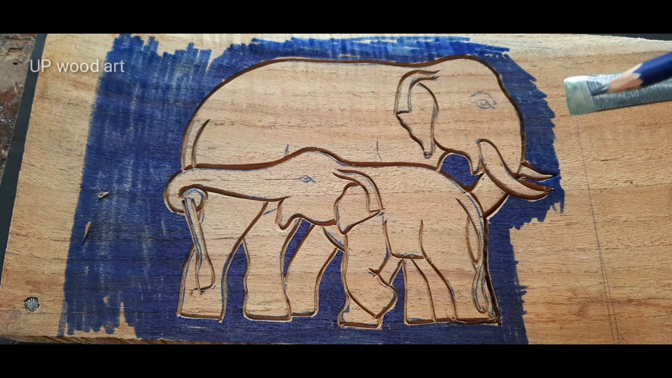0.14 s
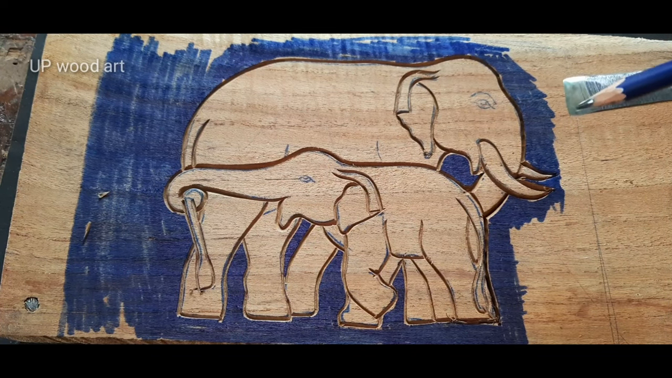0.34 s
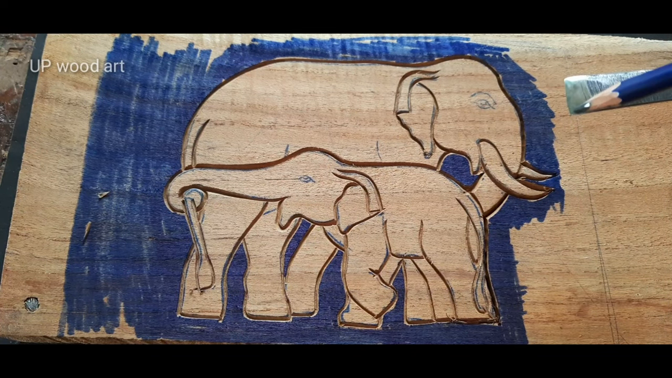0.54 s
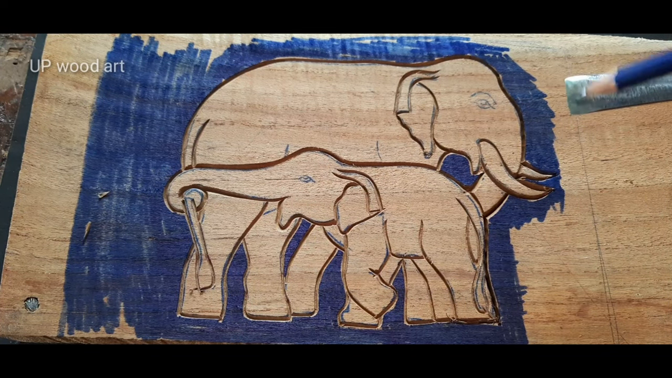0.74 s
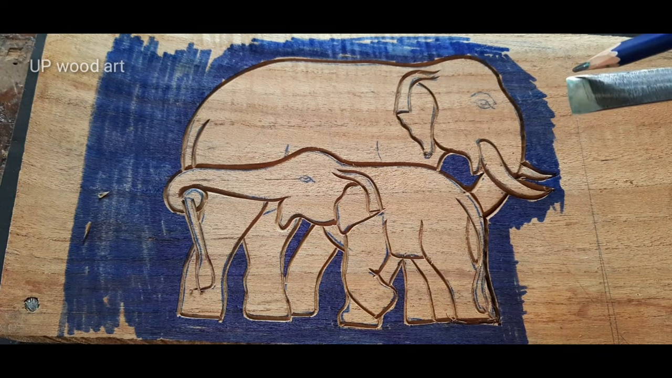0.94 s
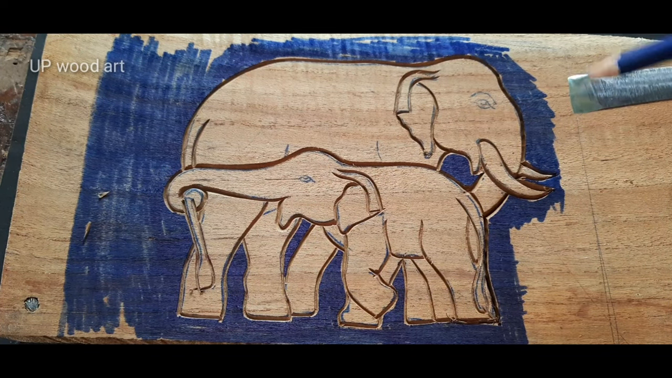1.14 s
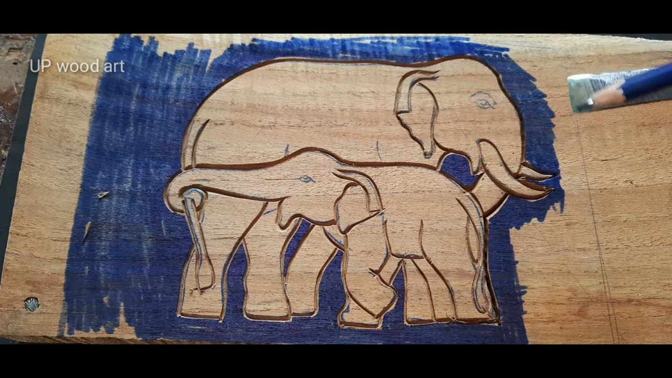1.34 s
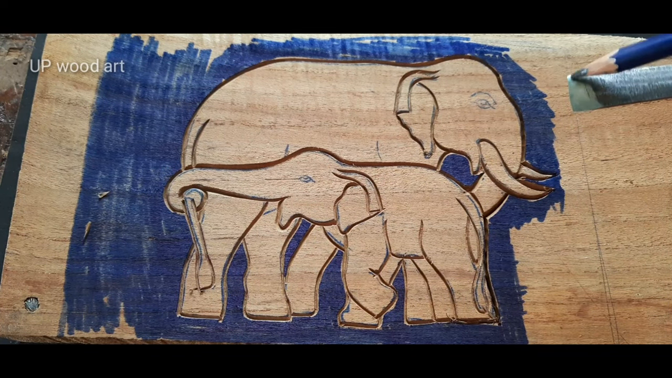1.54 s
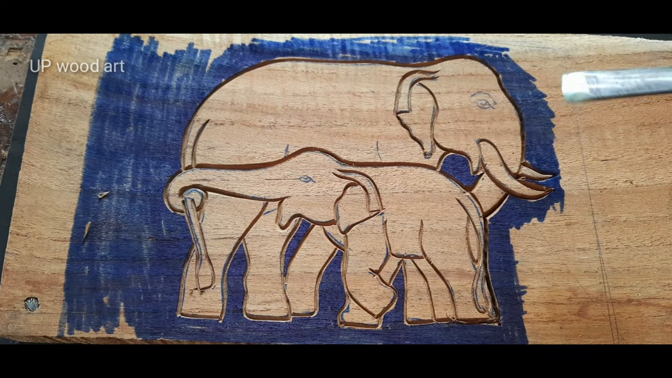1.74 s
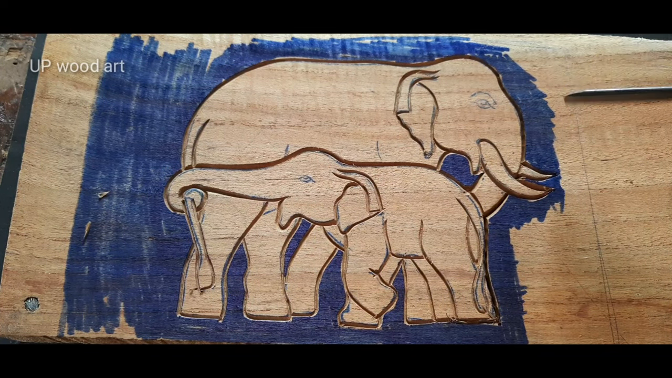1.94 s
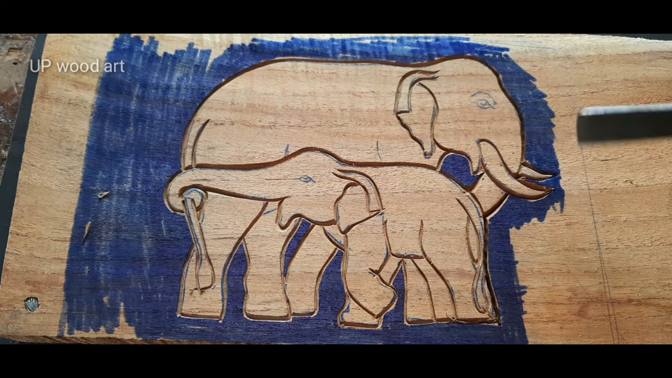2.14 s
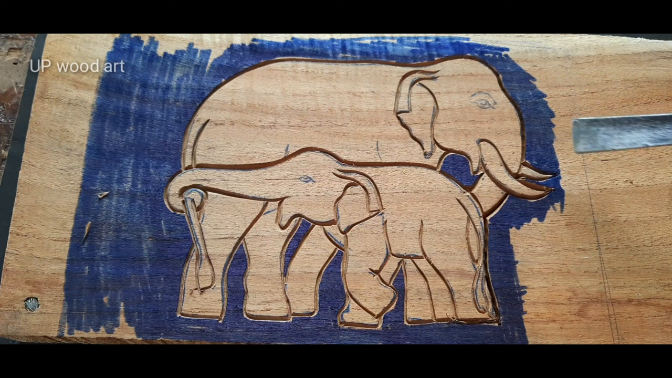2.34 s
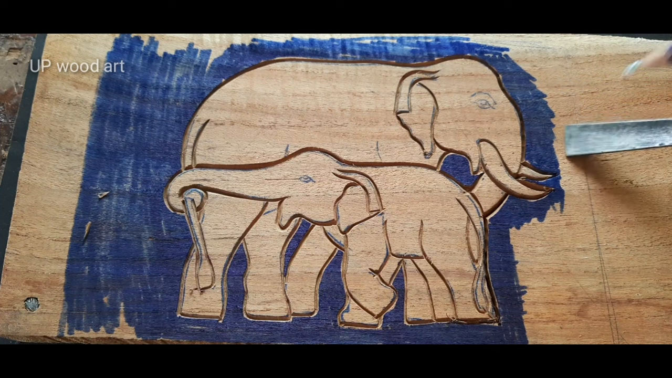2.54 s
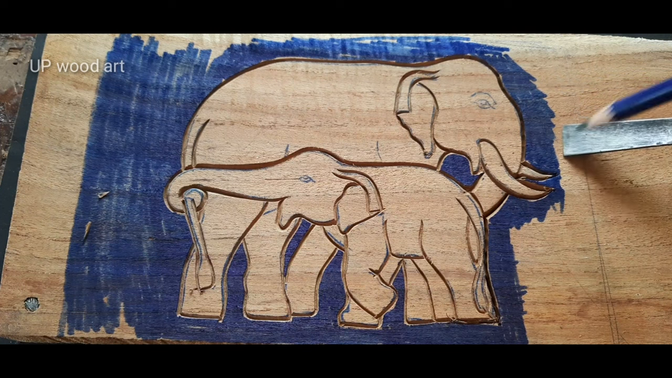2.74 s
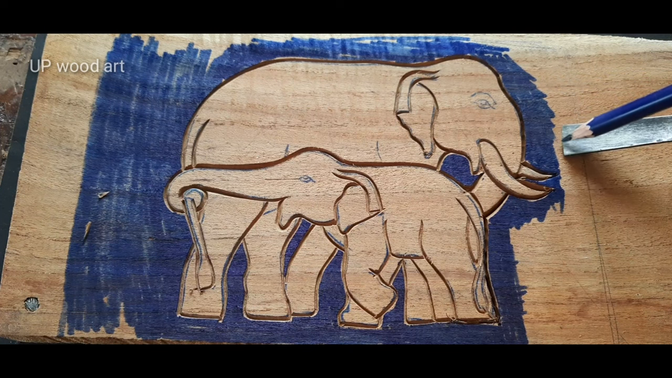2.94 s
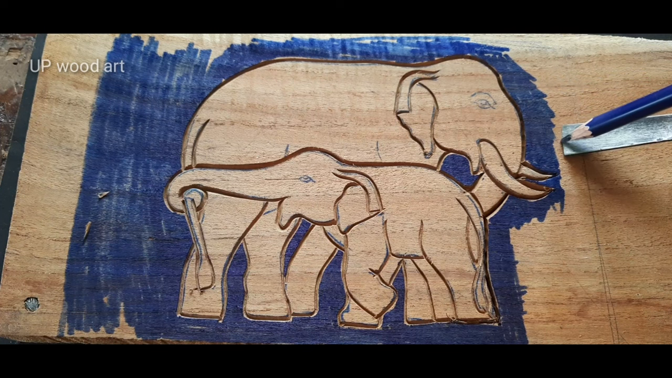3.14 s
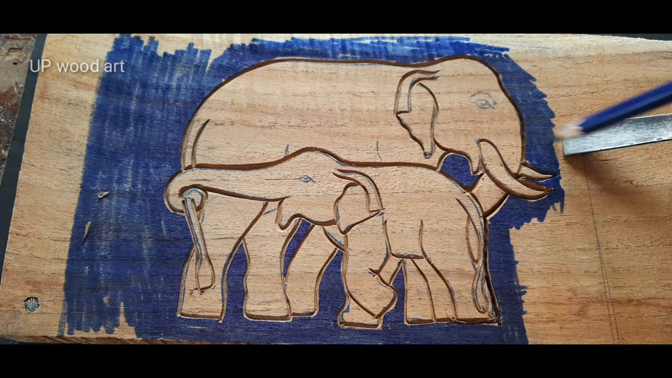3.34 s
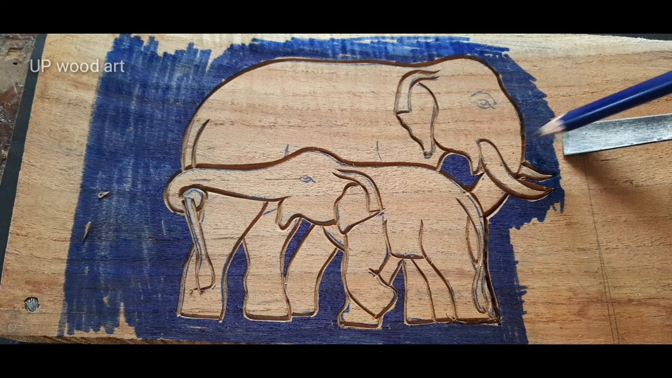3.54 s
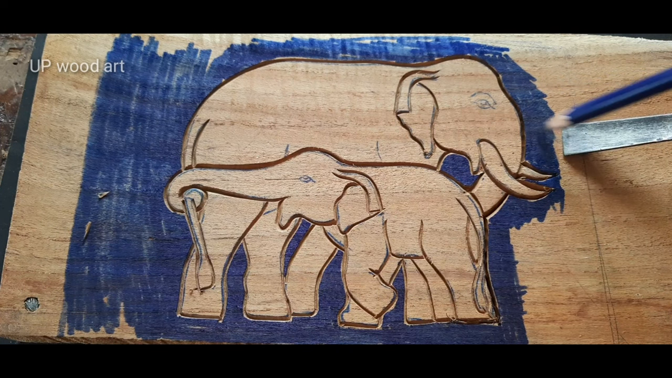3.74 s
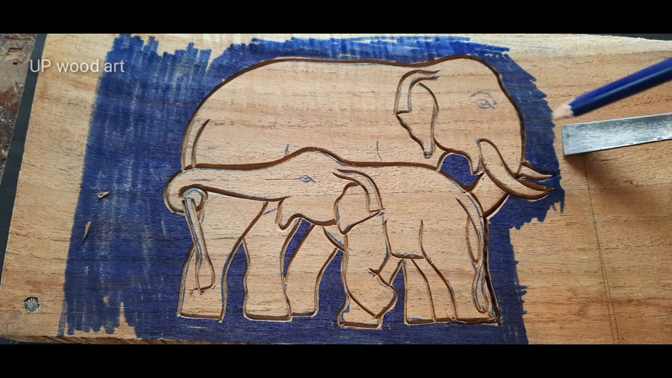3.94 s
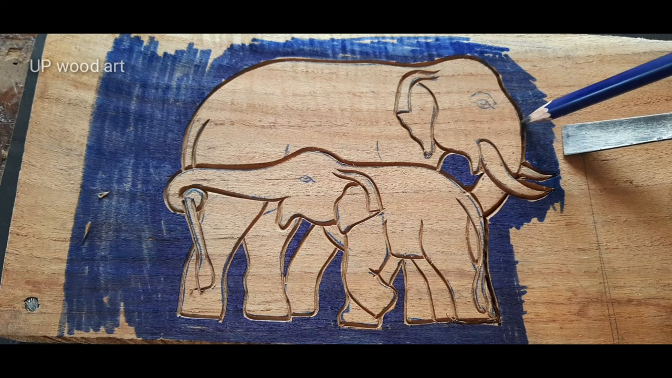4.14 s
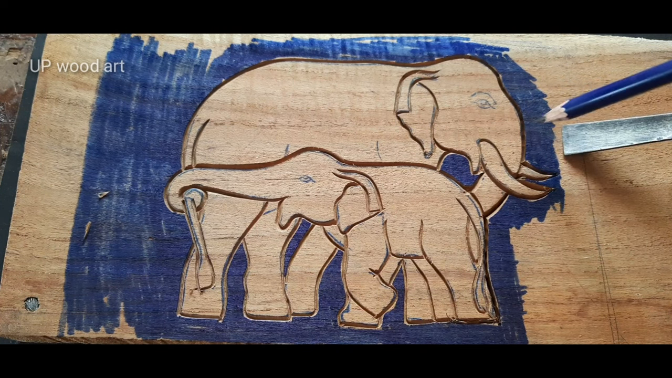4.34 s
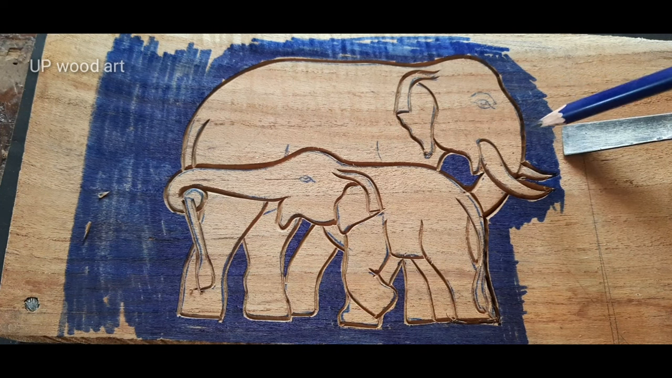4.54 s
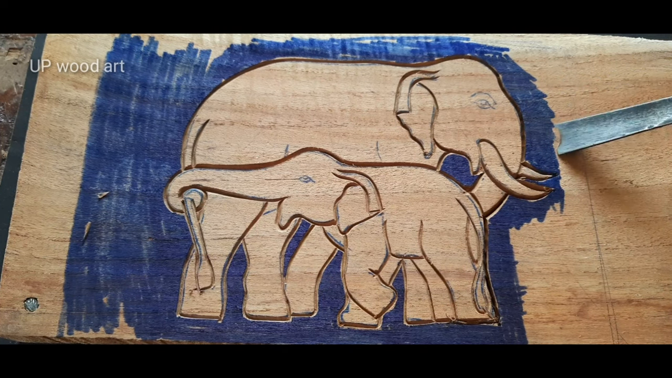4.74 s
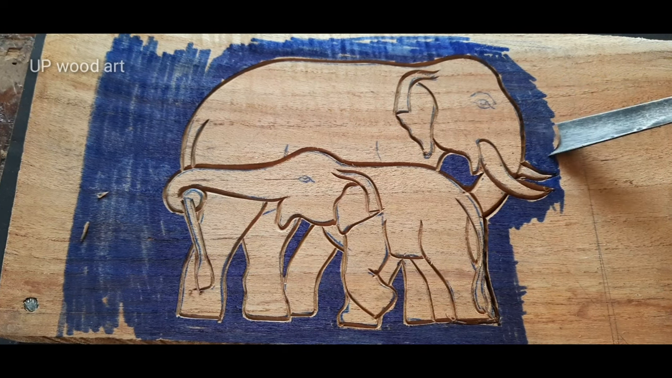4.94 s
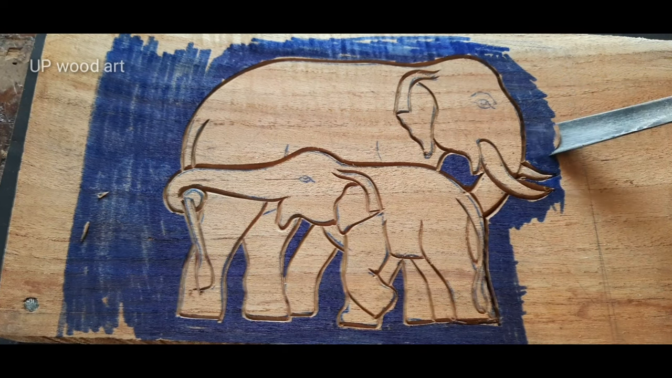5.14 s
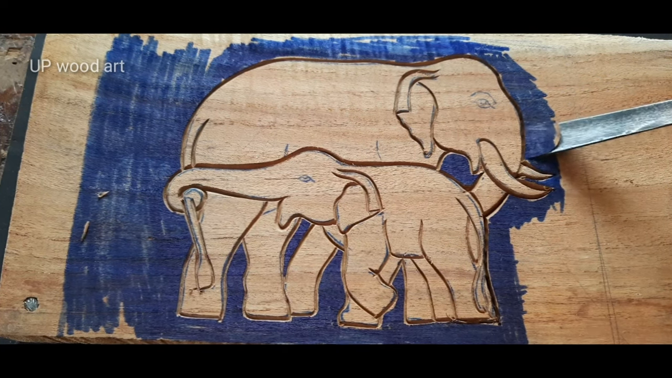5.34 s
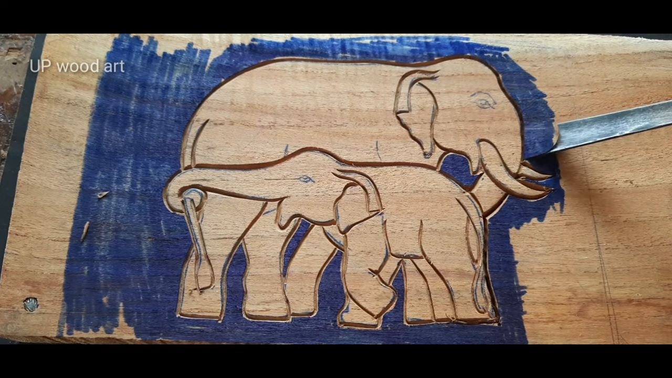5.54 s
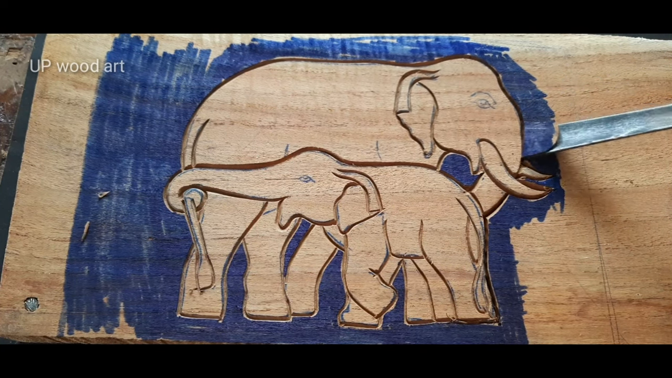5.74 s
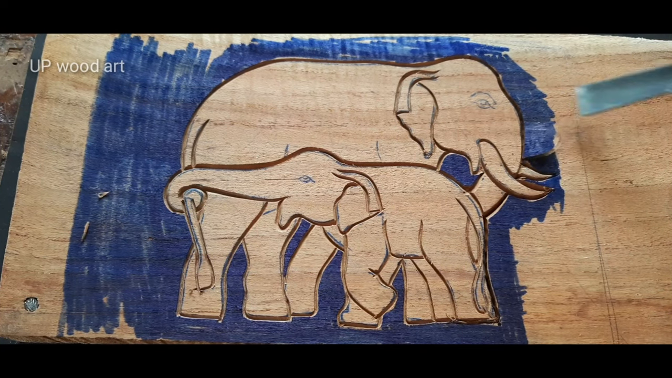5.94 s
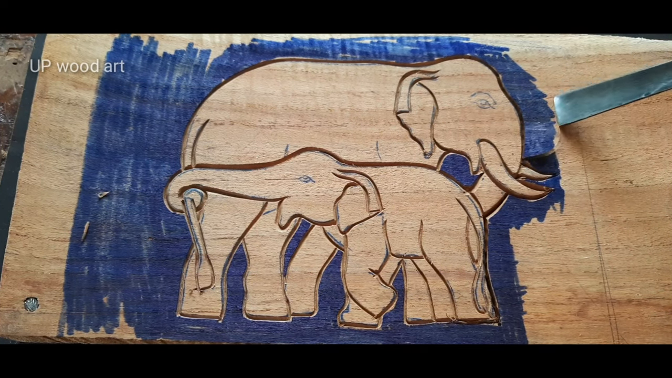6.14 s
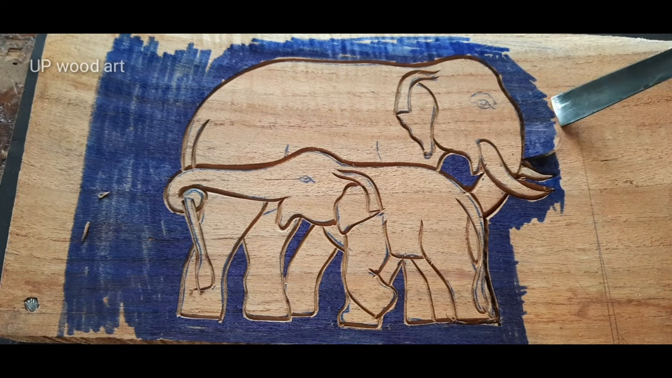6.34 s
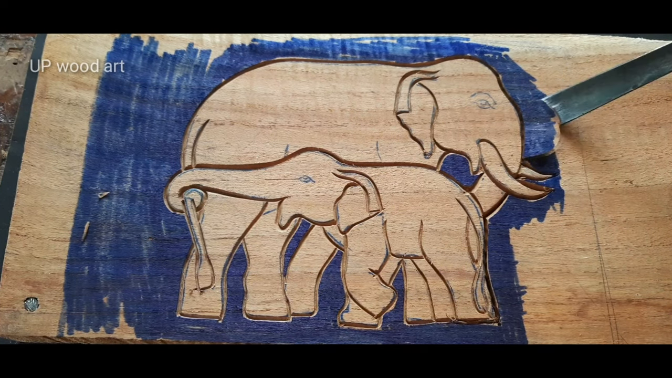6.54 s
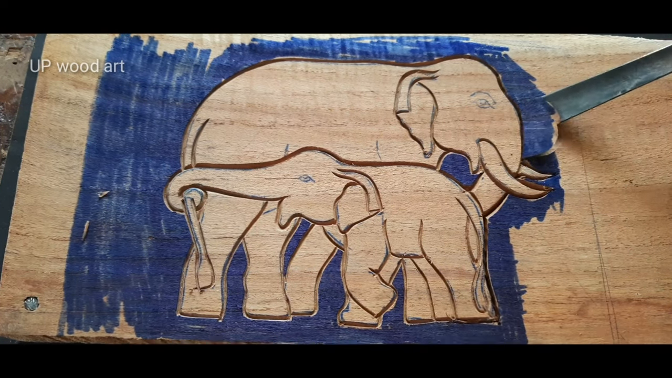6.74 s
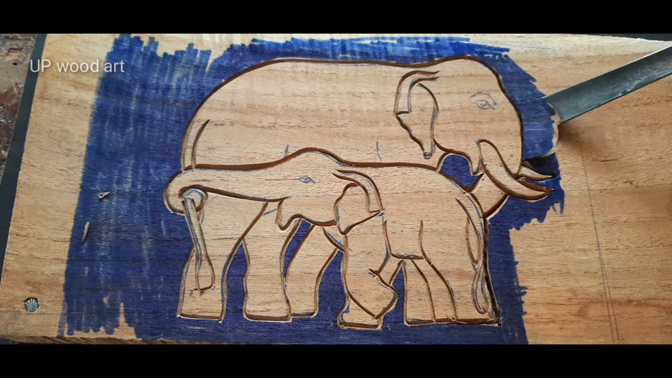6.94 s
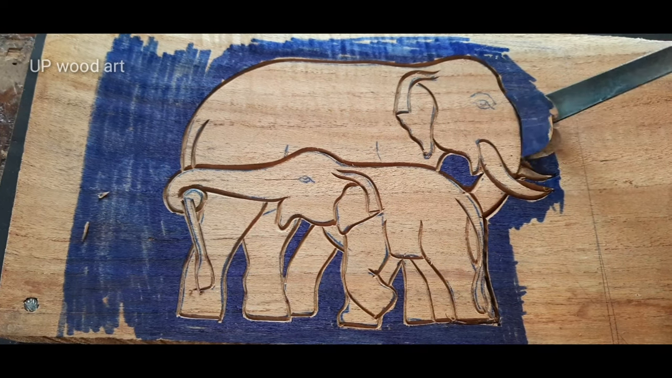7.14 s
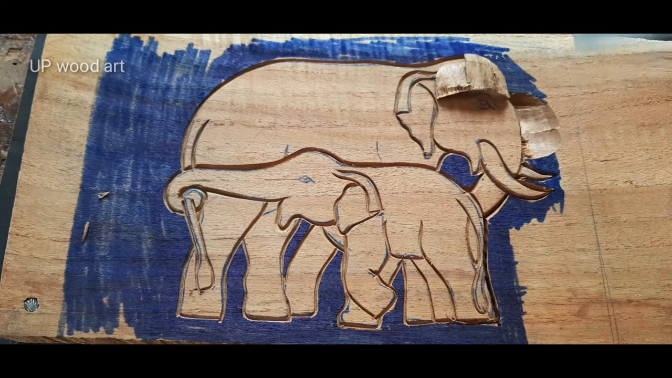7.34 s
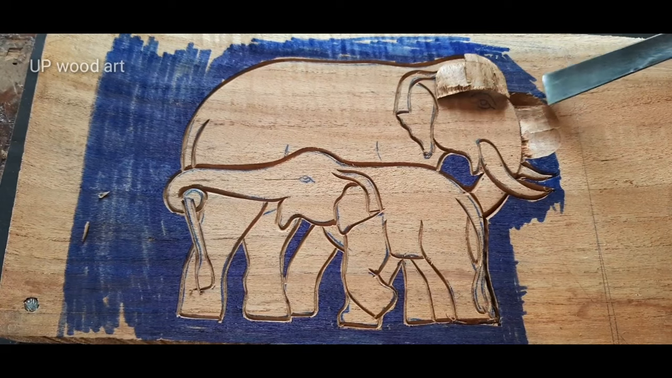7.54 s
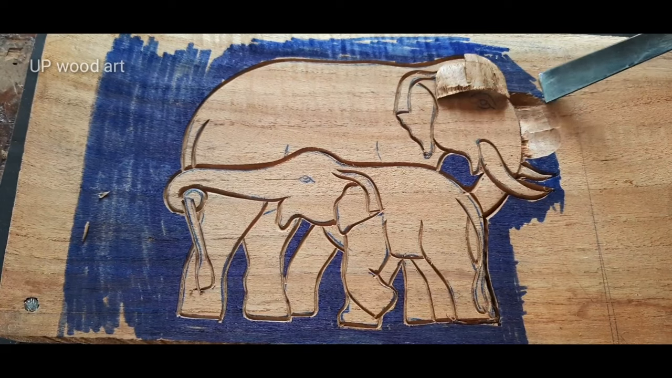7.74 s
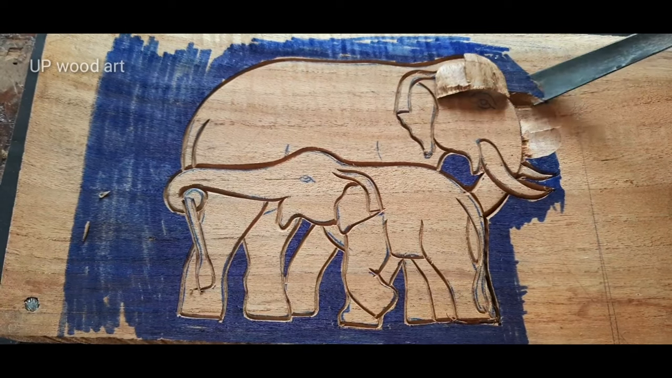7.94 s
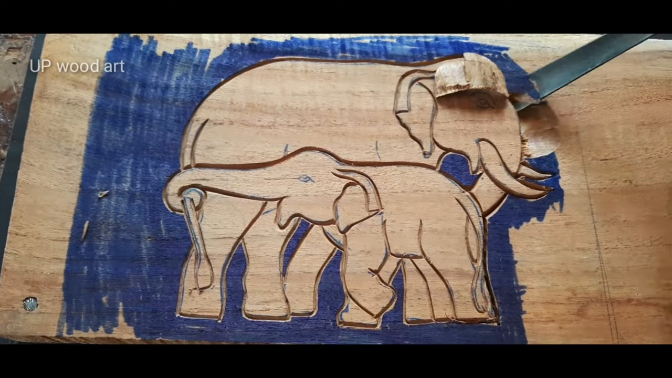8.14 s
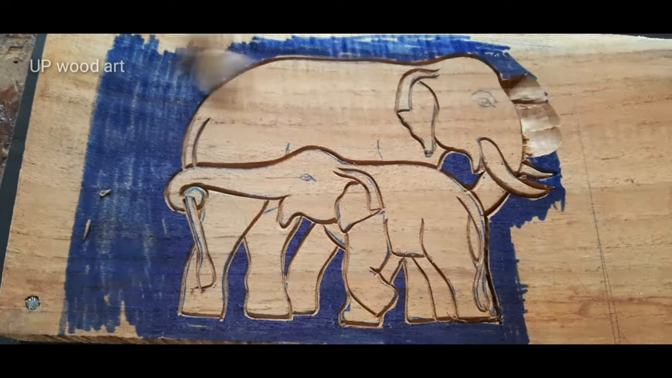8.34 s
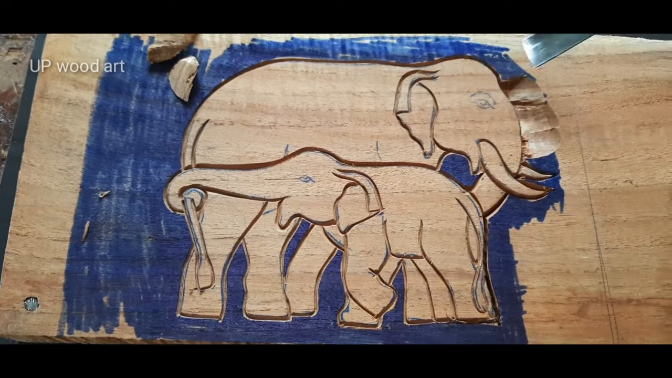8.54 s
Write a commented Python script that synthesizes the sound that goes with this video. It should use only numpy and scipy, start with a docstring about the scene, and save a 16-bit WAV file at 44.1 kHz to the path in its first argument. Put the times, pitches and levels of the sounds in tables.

```python
"""A carver drives a chisel through a wooden board in three bursts of mallet blows, under an open roof.
Each blow is a crack of ringing tool modes, a tear of random fibre snaps and a thump of board modes.
Chips snap off now and then; filtered noise makes the scuffs of the shifted tool and the rubbing edge.
Outside, a rooster crows in throat-shaped harmonics, birds call in gliding tones,
and filtered noise makes air, hiss and insects."""
import sys
import numpy as np
from scipy import signal
from scipy.fft import rfft, irfft
from scipy.io import wavfile
from scipy.ndimage import uniform_filter1d

SR = 44100
rng = np.random.default_rng(int(sys.argv[2]) if len(sys.argv) > 2 else 0)


def wav_record(signal):
    """Record a signal, one row per channel, as 16-bit PCM in the file named by sys.argv[1]."""
    frames = np.transpose(np.atleast_2d(signal))
    bounded = np.clip(frames, -1, 1)
    # unit amplitude maps onto the largest positive 16-bit level
    quanta = np.round(bounded * 32767).astype(np.int16)
    wavfile.write(sys.argv[1], SR, quanta)


N = 379260
TIME = np.arange(N) / SR
AGE = TIME[:SR * 3 // 5]  # seconds since an event began


def amp(db):
    """Decibels to gain."""
    return 10 ** (np.asarray(db) / 20)


def level(x, db, span_s=None):
    """Scale to an rms level, taken over the first span_s seconds or over all."""
    head = x if span_s is None else x[..., :int(span_s * SR)]
    return x * amp(db) / np.sqrt(np.mean(head ** 2) + 1e-30)


def pan(db):
    """Left and right gains of equal total power for a level difference, left minus right."""
    gains = amp(np.array([[db], [-db]]) / 2)
    return gains / np.sqrt(np.mean(gains ** 2))


def gain_at(hz, points):
    """Read (Hz, dB) points on a log-frequency axis."""
    f, db = np.transpose(points)
    return amp(np.interp(np.log(hz + 1), np.log(f), db))


def convolve(x, response):
    """Pass a sound through a response and keep its length."""
    size = x.shape[-1]
    return signal.oaconvolve(np.atleast_2d(x), np.atleast_2d(response)[:, :size], axes=1)[:, :size]


def colour(x, points):
    """Minimum-phase filter with the given (Hz, dB) shape, by folding its cepstrum."""
    size = 2048
    cepstrum = irfft(np.log(gain_at(np.arange(size // 2 + 1) * SR / size, points)))
    cepstrum[1:size // 2] *= 2
    cepstrum[size // 2 + 1:] = 0
    return convolve(x, irfft(np.exp(rfft(cepstrum))))


def wander(rate_hz, size=N):
    """Smooth random curve of spread near 1, with rate_hz fresh values a second."""
    step = max(int(SR / rate_hz), 1)
    held = np.repeat(rng.standard_normal(size // step + 1), step)
    return 1.2 * uniform_filter1d(held, step)[:size]


def noise(size, alike_hz):
    """Stereo noise, alike in both channels below alike_hz."""
    mid, side = rng.standard_normal((2, size))
    side = signal.sosfilt(signal.butter(2, alike_hz, "high", fs=SR, output="sos"), side)
    return np.array([mid + side, mid - side])


def fade(t, t60):
    """Exponential decay by 60 dB in t60 seconds."""
    return np.exp(-np.log(1000) * t / t60)


def space(t60_low, t60_high, alike_hz):
    """One second of diffuse echoes, unit energy per channel; bass and treble die at their own rates."""
    t = TIME[:SR]
    echoes = noise(len(t), alike_hz)
    low = signal.sosfilt(signal.butter(2, 1500, fs=SR, output="sos"), echoes)
    high = signal.sosfilt(signal.butter(2, 1500, "high", fs=SR, output="sos"), echoes)
    response = low * fade(t, t60_low) - high * fade(t, t60_high)
    return response / np.sqrt(np.sum(response ** 2) / 2)


def add(out, start_s, sound):
    """Mix a sound in at a given time."""
    i = max(int(start_s * SR), 0)
    out[:, i:i + sound.shape[-1]] += sound[..., :max(N - i, 0)]


def outdoors(air_db=-67.5, hiss_db=-3.0):
    """Filtered noise: low air that drifts, thin insect bands, a hiss that sinks once the blows begin."""
    # Spectra. Each row: frequency in Hz, relative density in dB.
    air_shape = [(15, -23.5), (40, 2), (99, 3), (200, -6.5), (400, -10), (850, -15.5), (1200, -19),
                 (2050, -17), (3400, -36.5), (5000, -43), (16000, -46)]
    hiss_shape = [(3000, -22), (5000, -17.5), (8500, -15), (10400, -17), (12500, -9), (14800, -3.5),
                  (15500, 0), (16000, -19.5)]
    # Each row: time in s, hiss level in dB before the hiss_db offset.
    hiss_level = [(0, -62.5), (2.5, -62), (4.8, -62.5), (5.3, -69.5), (8.6, -71)]
    # Each row: centre in Hz, width in Hz, level in dB before swell and flutter.
    insect_bands = [(5820, 590, -80.5), (7280, 490, -79)]
    # Each row: time in s, insect gain in dB.
    insect_swell = [(0, 3.5), (2.8, 3.5), (3.2, 2), (4.9, -2), (5.6, -10), (8.6, -3)]

    air_drift = amp(0.71 * wander(2.0) + 2.0 * wander(57))
    air = level(colour(noise(N, 420), air_shape), air_db) * air_drift * pan(11.0)

    hiss_gain = amp(np.interp(TIME, *np.transpose(hiss_level)))
    hiss = level(colour(noise(N, 300), hiss_shape), hiss_db) * hiss_gain * pan(2.9)

    insects = 0
    for hz, width_hz, db in insect_bands:
        shape = [(hz - 2 * width_hz, -45), (hz - width_hz / 2, -5), (hz, 0),
                 (hz + width_hz / 2, -5), (hz + 2 * width_hz, -45)]
        band = colour(noise(N, 300), shape)
        insects = insects + level(band, db) * amp(1.3 * wander(40))
    swell = amp(np.interp(TIME, *np.transpose(insect_swell)))
    return air + hiss + insects * swell * pan(-14.0)


def crow_note(hz, db, rough, tilt_db, beak_hz, jitter=.04, rasp_db=-21, waver=.006):
    """Harmonics and rasp through throat and beak; roughness shakes both pitch and level."""
    # Throat resonance. Each row: frequency in Hz, gain in dB.
    throat = [(450, -26), (700, -12.5), (920, -3), (1150, -8), (1350, -6), (1650, -3.5), (1950, -5),
              (2200, -4.5), (2600, -4.5), (2800, -17.5), (2980, -28.5), (3700, -40)]
    attack_s, release_s = 0.066, 0.013
    t = TIME[:len(hz)]
    gate = np.clip(np.minimum(t / attack_s, (t[-1] - t) / release_s), 0, 1)
    hz = hz * (1 + jitter * rough * wander(160, len(t)) + waver * wander(25, len(t)))
    phase = 2 * np.pi * np.cumsum(hz) / SR
    tone = 0
    for k in range(1, 7):
        beak = 1 / (1 + (k * hz / beak_hz) ** 20)  # shuts out harmonics above beak_hz
        tilt = amp(tilt_db * np.log2(k))  # tilt_db per octave
        tone = tone + gain_at(k * hz, throat) * tilt * beak * np.sin(k * phase)
    breath = colour(rng.standard_normal(len(t)), throat + [(6000, -66.5)])
    rasp = 2 * rough * level(breath, rasp_db)  # rasp_db holds at roughness 0.5
    return (tone + rasp) * gate * amp(db + 4 * rough * wander(200, len(t)))


def rooster(yard, direct=0.71, echo=1.0, tire_db=-7):
    """A far, harsh crow: arched syllables, then a break to a lower pitch that sinks; echo outweighs it."""
    # Held notes. Each row: start in s, length in s, nominal top pitch in Hz, source level in dB at the top.
    syllables = [(.225, 0.18, 919.7, -44.5), (0.462, 0.14, 928.5, -45.5), (0.619, 0.24, 930, -45),
                 (4.7, 0.26, 875, -60)]
    # Closing notes. Each row: start in s, length in s, nominal first and last pitch in Hz,
    # source level in dB at the start.
    sinks = [(0.828, 0.9, 726.7, 435.4, -53), (4.896, .38, 682, 442, -58)]
    droop, crest = 0.11, .38  # share of pitch lost by the end; share of the length at the top pitch
    rough_start, rough_end = .25, 1
    plunge, sink_fade_db = 0.28, -11.5  # share of the fall that comes late; level change by the end
    sink_rough, break_rough, break_s = 0.19, .7, 0.26  # steady; extra as the voice breaks; its decay

    voice = np.zeros((1, N))
    for s, length_s, hz, db in syllables:
        u = np.linspace(0, 1, int(length_s * SR))
        slack = ((u - crest) / (1 - crest)) ** 2
        rough = np.interp(u, [0, 1], [rough_start, rough_end])
        note = crow_note(hz * (1 - droop * slack), db + tire_db * slack, rough, tilt_db=1.5, beak_hz=3085)
        add(voice, s, note)
    for s, length_s, from_hz, to_hz, db in sinks:
        u = np.linspace(0, 1, int(length_s * SR))
        fallen = (1 - plunge) * u + plunge * u ** 4
        rough = sink_rough + break_rough * np.exp(-u * length_s / break_s)
        hz = from_hz + (to_hz - from_hz) * fallen
        add(voice, s, crow_note(hz, db + sink_fade_db * u ** 2, rough, tilt_db=0.32, beak_hz=2405))
    return (direct * voice + echo * convolve(voice, yard)) * pan(5.1)


def scuffs():
    """Soft scuffs as the tool is shifted: uneven noise that rises quickly and dies away in a long tail."""
    # Each row: start in s, rms level in dB over the first 0.13 s before panning.
    scuff_events = [(1.40, -63), (1.659, -69), (3.171, -65), (3.5, -58), (3.739, -58.5), (3.882, -55),
                    (4.058, -61.5), (4.268, -51.5), (4.663, -53.5), (4.801, -61), (6.954, -62.5)]
    # Spectrum. Each row: frequency in Hz, gain in dB.
    scuff_shape = [(40, -9), (140, 8), (230, 2.5), (550, 0.5), (1100, -1), (1800, -3), (2700, -5),
                   (4000, -11.5), (6500, -26.5), (9000, -24.5), (14000, -28)]
    rise_s, t60_s = 0.0083, 0.76
    out = np.zeros((2, N))
    swell = (1 - np.exp(-AGE / rise_s)) * fade(AGE, t60_s)
    for s, db in scuff_events:
        uneven = amp(0.83 * wander(300, len(AGE)))
        scuff = colour(noise(len(AGE), 500) * uneven, scuff_shape)
        add(out, s, level(scuff * swell, db, 0.13))
    return out * pan(5.5)


def fibres(cut_s, per_s=2500, spread_db=4):
    """Fibres snap one after another, as random pulses, for as long as the edge advances."""
    snaps = (rng.random(len(AGE)) < per_s / SR) * rng.choice([-1, 1], len(AGE))
    size = amp(spread_db * np.minimum(rng.exponential(size=len(AGE)), 3))
    return snaps * size * np.exp(-(AGE / cut_s) ** 3)


def chips(roof):
    """Chips snap off: very short flurries of fibre snaps, echoed by the roof."""
    # Each row: start in s, rms level in dB over the first 3.8 ms.
    chip_events = [(1.555, -58), (3.027, -57.5), (5.781, -51), (5.814, -57), (7.254, -45), (7.269, -47),
                   (8.336, -56), (8.344, -49), (8.388, -58)]
    shape = [(800, -3), (3000, 1.0), (7000, -8), (14000, -1)]  # (Hz, dB)
    out = np.zeros((2, N))
    for s, db in chip_events:
        snaps = fibres(0.0017)
        echoed = snaps + 1.04 * convolve(snaps, roof)
        add(out, s, level(colour(echoed, shape), db, 0.0038))
    return out


def birds(yard, whistle_s=0.27, whistle_hz=5320, lift_hz=380, hoot_s=0.22, chirp_direct=0.59, chirp_echo=0.74):
    """Gliding tones: a falling chirp with a soft lower ending, a thin rising whistle, a faint far hoot."""
    # Each row: start in s, starting pitch in Hz, relative level in dB.
    chirp_events = [(2.265, 3290, -49.5), (2.70, 3290, -50), (3.07, 3200, -46.5), (3.477, 3260, -45.5),
                    (3.867, 3120, -46), (4.275, 3260, -46.5), (4.644, 3110, -50)]
    # Each row: start in s, relative level in dB.
    whistle_events = [(2.001, -68), (5.919, -69.5), (7.3, -71), (8.48, -74)]
    # Each row: start in s, pitch in Hz, relative level in dB.
    hoot_events = [(2.22, 842, -72.5), (2.92, 863, -73.5), (3.38, 854, -75.5)]
    chirp_s, chirp_end_hz, chirp_husk = .1, 2903, .018
    accent, lead_in = 0.7, 0.24  # share of the length at which the note peaks; relative strength before that
    ending_hz, ending_fall_hz, ending_db, ending_delay_s = 2470, 108, -11.5, .062
    chirps, whistles, hoots = np.zeros((3, 1, N))

    def note(hz, husk):
        """A tone whose pitch trembles by the fraction husk."""
        return np.sin(2 * np.pi * np.cumsum(hz * (1 + husk * wander(300, len(hz)))) / SR)

    u = np.linspace(0, 1, int(chirp_s * SR))
    swell = 1.4 * np.interp(u / accent, [0, .5, .75, 1, 1 / accent], [0, lead_in, lead_in, 1, 0])
    for s, from_hz, db in chirp_events:
        fall = note(from_hz + (chirp_end_hz - from_hz) * u, chirp_husk)
        add(chirps, s, amp(db) * swell * fall)
        ending = np.sin(np.pi * u) * note(ending_hz - ending_fall_hz * u, 0.024)
        add(chirps, s + ending_delay_s, amp(db + ending_db) * ending)

    u = np.linspace(0, 1, int(whistle_s * SR))
    for s, db in whistle_events:
        swell = np.interp(u, [0, .2, .5, .75, 1], [0, 1.9, 0.4, 1.6, 0.038])
        swell = swell * amp(2.1 * wander(45, len(u)))
        add(whistles, s, amp(db) * swell * note(whistle_hz + lift_hz * u ** 3, 0.0048))

    u = np.linspace(0, 1, int(hoot_s * SR))
    for s, hz, db in hoot_events:
        add(hoots, s, amp(db) * np.sin(np.pi * u) * note(np.full(len(u), hz), 0.012))

    trees = space(t60_low=.7, t60_high=.68, alike_hz=400)
    chirps = (chirp_direct * chirps + chirp_echo * convolve(chirps, trees)) * pan(6.0)
    whistles = .6 * (whistles + convolve(whistles, trees)) * pan(-2.0)
    return chirps + whistles + hoots + convolve(hoots, yard)


def crack(part_db, detune=0.017, rebound=0.3, grit=0.4, grit_s=0.0026, port_lag_s=0.000395):
    """An impact, a kick back and brief grinding ring handle, blade and edge; the left port hears it last."""
    # Tool modes. Each row: nominal frequency in Hz, t60 in s, level in dB within its part,
    # left minus right in dB.
    chisel_modes = [(634, 0.02, -3, 1.5), (805, 0.022, -2, 12.5), (1099.5, 0.028, -0.5, 22),
                    (1501, 0.012, 6.5, 18), (1731, 0.01, -2, -3.5), (2000, 0.012, -11, 9.5),
                    (2666, 0.012, 4, 10.5), (3380, 0.011, 1, -1), (3635, 0.013, -1, -22.5),
                    (4750, 0.0021, -2, -7), (6435, 0.016, -8.5, -4.5), (7050, 0.0031, 2, -8.5),
                    (8470, 0.0059, -9, -19.5), (10200, 0.0037, -18.5, 8.5), (11740, 0.0066, -10.5, -4.5),
                    (14800, 0.0063, -15, -0.5)]
    handle_top_hz, blade_top_hz = 2100, 4300
    age = AGE[:SR // 20]
    t = np.maximum(age - np.array([[port_lag_s], [0]]), 0)
    force = grit * rng.standard_normal(len(age)) * np.exp(-age / grit_s) / 2
    force[0] += 1
    force[int(rng.uniform(.0012, .0022) * SR)] += rebound
    parts = np.zeros((3,) + t.shape)
    for hz, t60, db, side_db in chisel_modes:
        pitch = hz * (1 + detune * rng.standard_normal())
        onset = 1 - np.exp(-t * hz * 2)  # time constant of half a cycle
        mode = np.sin(2 * np.pi * pitch * t) * fade(t, t60) * onset
        parts[np.searchsorted([handle_top_hz, blade_top_hz], hz)] += amp(db) * pan(side_db) * mode
    return sum(level(convolve(part, force), db, .006) for part, db in zip(parts, part_db))


def thump(cut_s, main_hz, main_db, roof, main_t60=0.17, scatter_db=3.5, detune=0.025,
          rattle_db=-2.0, rise=0.59, port_turns=0.016):
    """The push of the cut swells the board's modes and rattles the bench; rattle_db is against the ring."""
    # Board modes. Each row: nominal frequency in Hz, t60 in s before damping, mean relative level in dB.
    board_modes = [(47.5, 0.43, -25.5), (72, 0.35, -16.5), (99, 0.43, -17), (129, 0.21, -8),
                   (148.8, 0.2, -12), (180, 0.15, -11.5), (266, 0.1, -9.5), (353, 0.15, -4),
                   (403.6, 0.3, -19), (542.6, 0.18, -8.5), (627, 0.12, -5.5), (741, 0.091, -3.5)]
    # Rattle spectrum. Each row: frequency in Hz, gain in dB.
    bench_shape = [(20, -37.5), (50, -8.5), (135, 2), (200, -2), (330, 9.5), (430, -6.5), (600, -14.5),
                   (1200, -64)]
    damping = 1.105  # the blade wedged in the wood shortens every ring by this factor
    modes = []
    for hz, t60, db in board_modes:
        pitch = hz * (1 + detune * rng.standard_normal())
        modes.append((pitch, t60, db + scatter_db * rng.standard_normal()))
    ring = 0
    for hz, t60, db in modes + [(main_hz, main_t60, main_db)]:
        # each mode meets the two ports a little apart
        phase = rng.random() + port_turns * rng.standard_normal((2, 1))
        ring = ring + amp(db) * np.sin(2 * np.pi * (hz * AGE + phase)) * fade(AGE, t60 / damping)
    ring = ring * (1 - np.exp(-(AGE / (rise * cut_s)) ** 2))
    rattle = colour(convolve(fibres(cut_s), roof), bench_shape)
    return level(ring, 0) + level(rattle, rattle_db)


def knocks(roof):
    """The tool touches the board without cutting: a dull tick and a short ring of the wood."""
    # Each row: start in s, handle level of the tick in dB, board level in dB over the first 30 ms,
    # main board mode at that spot in Hz.
    knock_events = [(2.5807, -35, -50.5, 414), (3.734, -53, -72, 327), (4.051, -48.5, -62, 310),
                    (5.835, -47.5, -51, 553), (7.944, -56.5, -54, 535), (8.495, -59, -48, 516)]
    contact_s, mode_db, rattle_db, roof_db = 0.014, 3.5, -9.5, -4.5
    blade_db, edge_db = -12, -21.5  # against the handle
    out = np.zeros((2, N))
    for s, tick_db, board_db, main_hz in knock_events:
        tick = np.zeros((2, len(AGE)))
        add(tick, 0, crack([tick_db, tick_db + blade_db, tick_db + edge_db]))
        add(out, s, tick + amp(roof_db) * convolve(tick, roof))
        ring = thump(contact_s, main_hz, mode_db, roof, rattle_db=rattle_db)
        add(out, s, level(ring, board_db, 0.03))
    return out


def blows(roof, direct=0.53):
    """Every mallet blow is a crack, a tear and a thump; a longer cut tears and splinters more."""
    # Each row: start in s, handle, blade and edge levels in dB over 6 ms, push on the board in dB over 79 ms,
    # length of the cut in s, main board mode at that spot in Hz.
    blow_events = [(4.912, -31, -36.5, -60, -29, 0.016, 322.5),
                   (5.202, -30, -22.5, -40, -28.5, 0.032, 310.3),
                   (5.4544, -12.5, -20.5, -26.5, -28, .015, 350.7),
                   (5.6021, -12, -28, -36, -27.5, 0.012, 317.5),
                   (5.7256, -13, -24.5, -36, -24.5, 0.0092, 310),
                   (6.467, -29.5, -32.5, -48, -24.5, 0.025, 316),
                   (6.7521, -17, -26, -27.5, -31, 0.029, 312),
                   (7.007, -29, -32.5, -51.5, -29.5, 0.035, 299.5),
                   (7.1741, -14.5, -40, -45.5, -27.5, 0.0029, 296),
                   (7.8375, -16.5, -12.5, -29.5, -28, 0.016, 309),
                   (8.0384, -16.5, -16.5, -20.5, -37.5, 0.024, 331.6),
                   (8.1867, -11, -18, -26.5, -29, 0.014, 307),
                   (8.2666, -32, -64, -71, -27.5, 0.0037, 357.3)]
    # Spectra of tearing fibres and splinters. Each row: frequency in Hz, gain in dB.
    tear_shape = [(200, -19.5), (450, 2), (620, 3.5), (800, -0.5), (930, -1), (1100, -4.5), (1600, -9),
                  (2100, -8), (2500, -6.5), (3100, -9.5), (3700, -17.5), (4600, -27.5), (9000, -56.5)]
    splinter_shape = [(2000, -42), (4300, 0), (5600, 1), (7200, -1.5), (8600, -6.5), (10200, -10.5),
                      (12300, -7), (16000, -14.5)]
    usual_cut_s, usual_push_db = 0.021, -26
    tear_rel_db, tear_db_per_doubling = -3.5, 3  # against the push; per doubling of the cut length
    splinter_rel_db, splinter_db_per_doubling = -22.5, 6.5
    main_mode_db, main_mode_growth = 4, 0.65  # at a usual push; dB per dB of push

    out, cracks = np.zeros((2, 2, N))
    for s, handle_db, blade_db, edge_db, push_db, cut_s, main_hz in blow_events:
        doublings = np.log2(cut_s / usual_cut_s)
        tear_db = push_db + tear_rel_db + tear_db_per_doubling * doublings
        splinter_db = push_db + splinter_rel_db + splinter_db_per_doubling * doublings
        main_db = main_mode_db + main_mode_growth * (push_db - usual_push_db)
        add(cracks, s, crack([handle_db, blade_db, edge_db]))
        snaps = fibres(cut_s)
        torn = direct * snaps + convolve(snaps, roof)
        add(out, s, level(colour(torn, tear_shape) * pan(1.5), tear_db, 0.13))
        add(out, s, level(colour(torn, splinter_shape) * pan(-3.5), splinter_db, 0.077))
        add(out, s, level(thump(cut_s, main_hz, main_db, roof), push_db, 0.079))
    return out + cracks + amp(-20) * convolve(cracks, roof)


def carving(late_db=-27):
    """Chips, knocks and blows share a brief roof echo; a longer yard echo is strongest near 100 Hz."""
    roof = space(t60_low=0.15, t60_high=0.13, alike_hz=563)
    bench = chips(roof) + knocks(roof) + blows(roof)
    tail = convolve(bench, space(t60_low=0.89, t60_high=0.23, alike_hz=250))
    late = colour(tail, [(40, -6.5), (100, 15), (200, 6.5), (350, -11.0), (1000, -17.5), (8000, -3)])
    return bench + amp(late_db) * late


def bedding(uneven_db=-2.0):
    """The edge is bedded for the next cut: dull, uneven noise; each rub swells and sinks."""
    # Each row: start in s, length in s, rms level in dB before panning.
    bedding_events = [(5.852, 0.89, -65), (7.579, 0.4, -67), (8.392, 0.15, -65)]
    # Spectrum. Each row: frequency in Hz, gain in dB.
    bedding_shape = [(40, -3.5), (100, 4.5), (170, -4.5), (260, 4.5), (420, -5.5), (900, -15.5),
                     (1900, -21), (3200, -37), (8000, -54)]
    out = np.zeros((2, N))
    for s, length_s, db in bedding_events:
        size = int(length_s * SR)
        rub = colour(noise(size, 500), bedding_shape) * amp(uneven_db * wander(25, size))
        swell = np.sin(np.linspace(0, np.pi, size)).clip(0) ** .5
        add(out, s, level(rub * swell, db))
    return out * pan(2.5)


def scene():
    """The bench close by, the yard beyond."""
    yard = space(t60_low=1.05, t60_high=1.0, alike_hz=400)
    return outdoors() + rooster(yard) + scuffs() + carving() + birds(yard) + bedding()


def record(dry):
    """The recorder rounds the tallest peaks and cuts the top."""
    top_hz = 15700
    rounded = dry / (1 + dry ** 4) ** (1 / 4)
    return signal.sosfilt(signal.ellip(10, .2, 80, top_hz, fs=SR, output="sos"), rounded)


dry = scene()
out = record(dry)
wav_record(out)
```